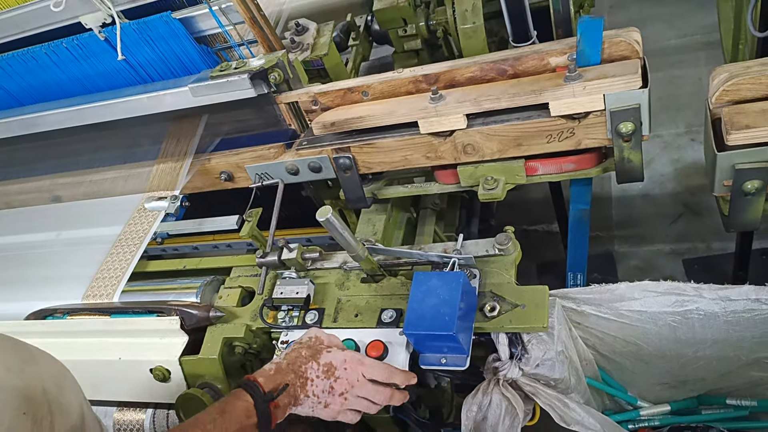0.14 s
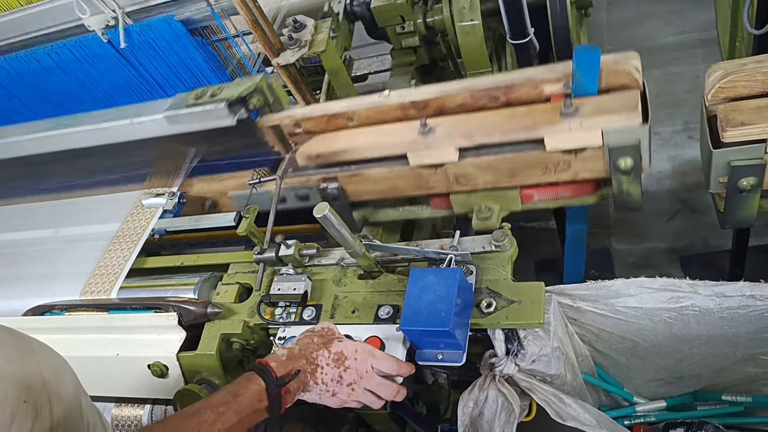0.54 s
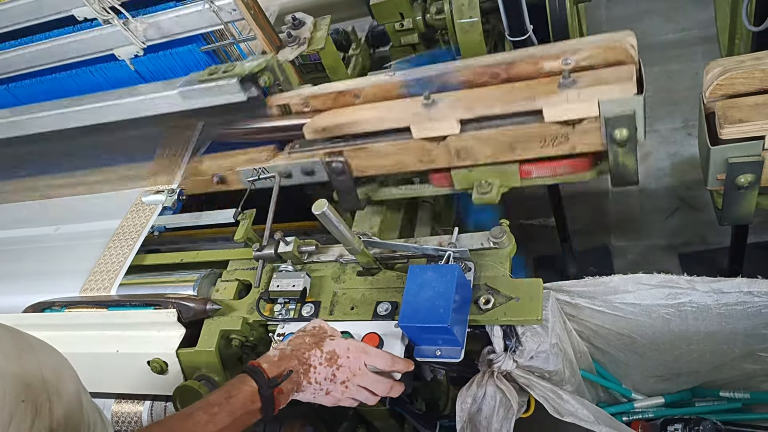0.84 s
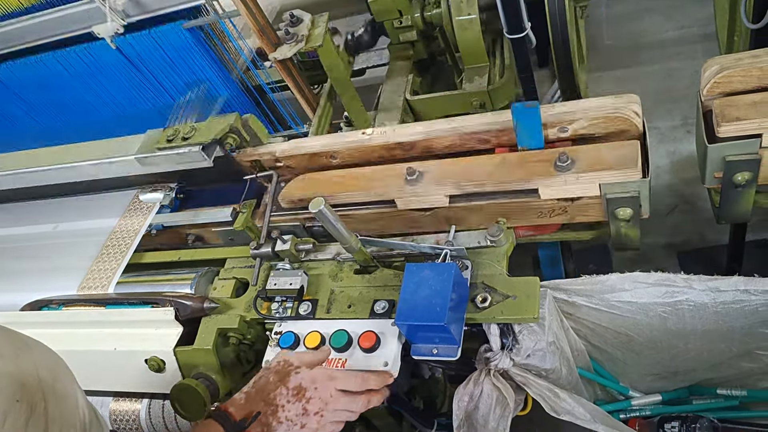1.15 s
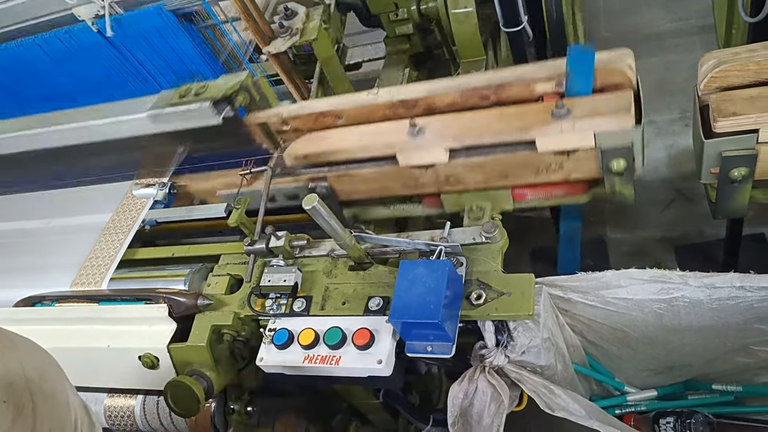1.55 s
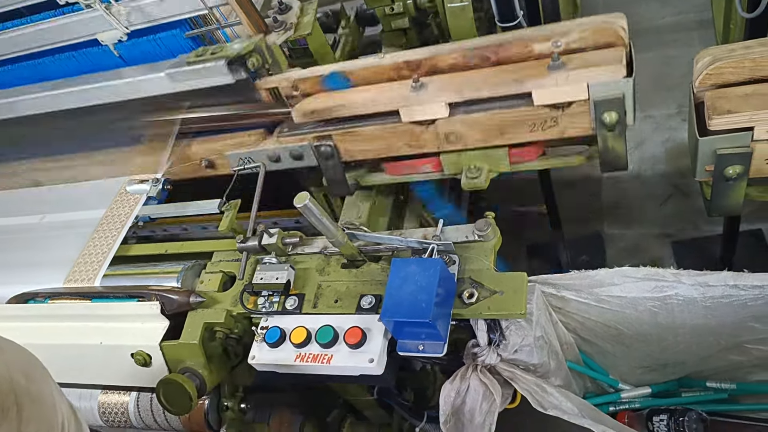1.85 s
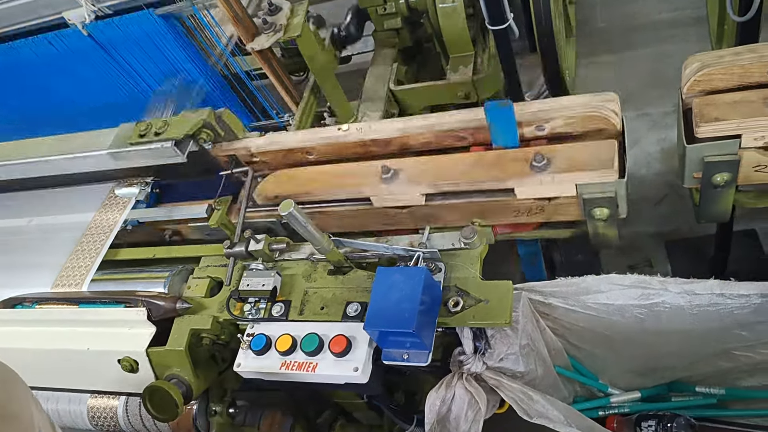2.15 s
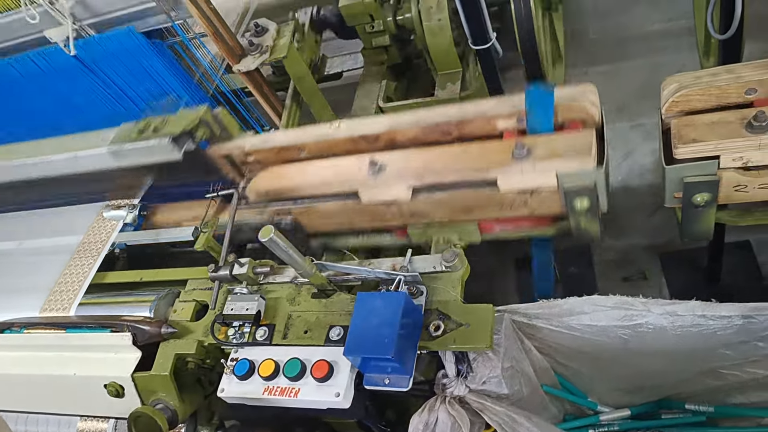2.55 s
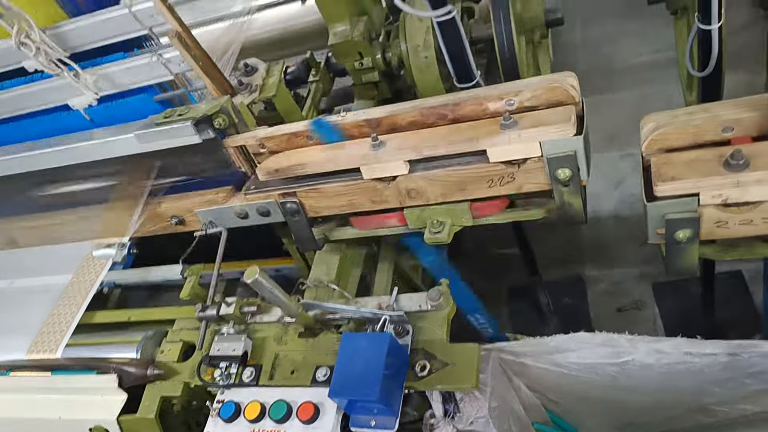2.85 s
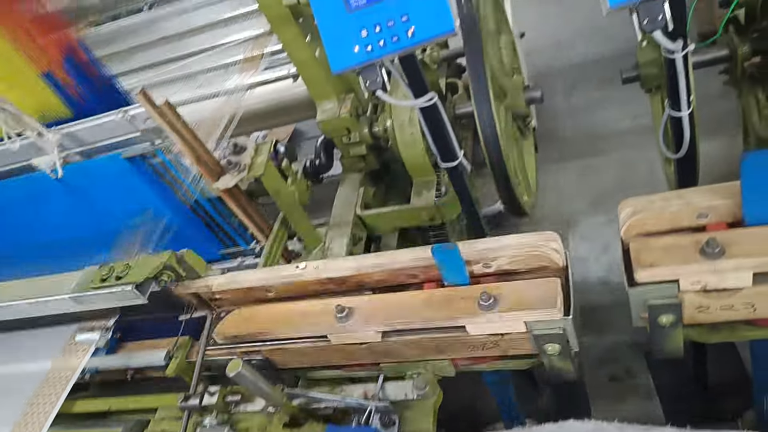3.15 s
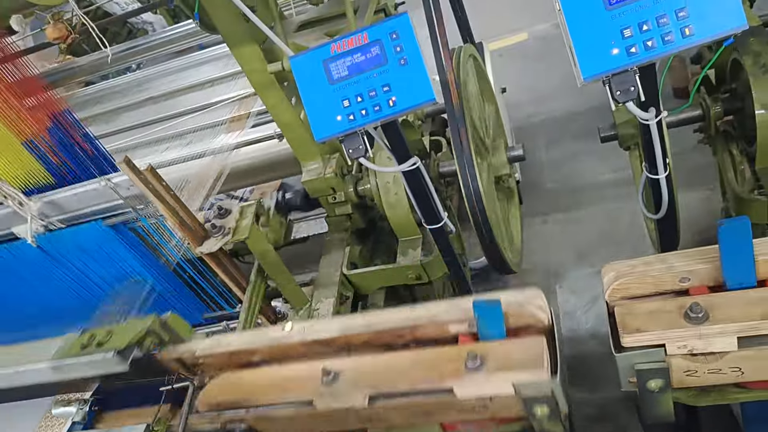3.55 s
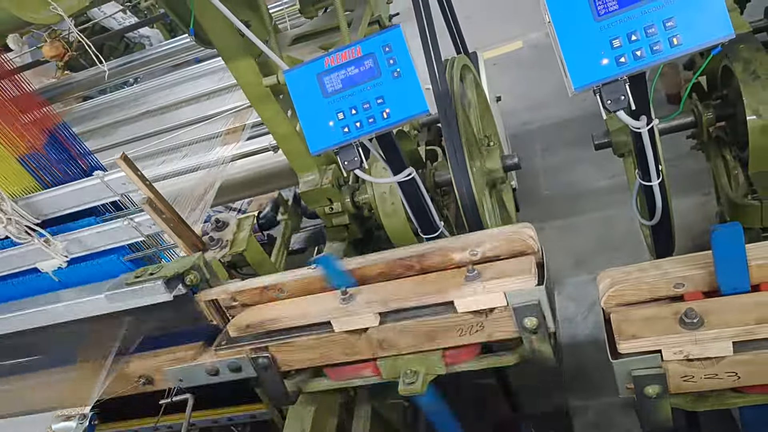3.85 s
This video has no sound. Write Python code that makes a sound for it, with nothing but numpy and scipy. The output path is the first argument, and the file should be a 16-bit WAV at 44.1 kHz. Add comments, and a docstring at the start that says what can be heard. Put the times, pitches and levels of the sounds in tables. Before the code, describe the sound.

A shuttle loom starts up in a hard-walled workshop. Low lumpy hum and faint hiss until 0.45 s, when the starter clunks and whirring begins; the clutch knocks at 0.7 s. From about 1 s, loud cracks come roughly every quarter second, four per turn, with clanks, rattling wash and small clatter between. Low thumps jolt the close stereo microphone, peaks softly clipped; it is still running at 4 s.

```python
"""A hard workshop, where idle machines hum and hiss behind a shuttle loom that starts up. The starter clunks,
the clutch takes up, gears and belt whir, then four blows repeat every turn: throw, landing, throw back,
far landing, with small linkage clatter between. Blows are noise cracks with a rattling wash that dies with the
room, coloured by the frame; damped sines make steel clanks and small knocks, and sagging sines make the shocks
through the microphone body. Two unequal ports hear it all under a soft ceiling."""
import sys
import numpy as np
from scipy import signal
from scipy.fft import rfft, irfft, next_fast_len
from scipy.io import wavfile
from scipy.ndimage import uniform_filter1d, map_coordinates

SR = 44100
rng = np.random.default_rng(int(sys.argv[2]) if len(sys.argv) > 2 else 0)


def generate_wav(sig):
    """Save sig (samples, or channels by samples) to the path in sys.argv[1] as 16-bit PCM at SR."""
    pcm = np.round(np.clip(np.atleast_2d(sig).T, -1, 1) * 32767).astype(np.int16)
    wavfile.write(sys.argv[1], SR, pcm)


N = 176400  # samples, 4 s

# Blows of the turning loom, levels ahead of frame and microphone:
# start_s, crack_db (nominal peak), wash_db (before its rise and unevenness)
THROW_BLOWS = [(1.479, 2, -14.5), (1.5, -5.5, -24.5), (2.461, -6.5, -19), (2.49, -10, -23.5),
               (3.445, -2.5, -18)]
LANDING_BLOWS = [(1.659, 3.5, -11.5), (1.679, -2.5, -14), (2.642, 1.5, -14.5), (2.662, -2.5, -15.5),
                 (3.624, 1, -12.5), (3.646, 2, -19.5)]
THROW_BACK_BLOWS = [(0.942, -36, -16), (0.957, -22, -29), (0.984, -1, -14.5), (1.008, -3, -13),
                    (1.968, -4, -24), (1.977, 1.5, -34), (1.988, -10, -16), (2.95, -12, -22.5),
                    (2.959, 1.5, -22.5), (2.973, -4.5, -20.5), (3.932, -8, -24), (3.941, -0.5, -17),
                    (3.959, -7, -33)]
FAR_LANDING_BLOWS = [(1.1861, 0, -13), (1.213, -5, -29), (2.153, -9.5, -19), (2.178, 0.5, -18),
                     (3.129, -16, -23), (3.157, -0.5, -18)]
LINKAGE_BLOWS = [(1.1099, -4.5, -22.5), (1.4216, -13, -21), (1.619, -17, -24.5), (1.924, -9.5, -20.5),
                 (2.095, -9, -23.5), (2.425, -12, -24), (2.6017, -14.5, -25.5), (2.909, -13.5, -21.5),
                 (3.078, -7, -25.5), (3.3834, -16.5, -30), (3.4087, -28, -28), (3.8855, -14.5, -25.5),
                 (3.9075, -15, -26.5)]


def amp(db):
    """Decibels as a gain."""
    return 10 ** (np.asarray(db) / 20)


def unit(x):
    """Scale to an rms of 1."""
    return x / np.sqrt(np.mean(x ** 2) + 1e-20)


def along(points, hz):
    """Read a (Hz, value) table, straight between points on a log frequency axis."""
    point_hz, value = np.transpose(points)
    return np.interp(np.log(hz + 1), np.log(point_hz + 1), value)


def curve(rows):
    """A (s, dB) table as gain per sample."""
    return amp(np.interp(np.arange(N) / SR, *np.transpose(rows)))


def wobble(rate):
    """A smooth random curve through normal values, rate knots a second."""
    knots = rng.standard_normal(int(N / SR * rate) + 9)
    return map_coordinates(knots, [np.arange(N) * rate / SR])


def filtered(x, response):
    """Multiply the spectrum of x by a response of frequency."""
    size = next_fast_len(N + 8192)  # spare room keeps tails from wrapping round
    hz = np.fft.rfftfreq(size, 1 / SR)
    return irfft(rfft(x, size) * response(hz), size)[..., :N]


def rush(spectrum, least=0):
    """Coloured stereo noise of rms 1; mid and side shares set how alike the two sides are."""
    # left-right likeness, wide in the treble: pitch_hz, correlation (0 to 1)
    likeness = [(60, 0.99), (300, 0.95), (650, 0.26), (1400, 0.013)]

    def mid_side(hz):
        turn = np.arccos(np.clip(along(likeness, hz), least, 1)) / 2
        return amp(along(spectrum, hz)) * [np.cos(turn), np.sin(turn)]

    mid, side = filtered(rng.standard_normal((2, N)), mid_side)
    return unit(np.array([mid + side, mid - side]))


def sides(pan_db):
    """Left and right gain for a left-right difference."""
    return amp([[pan_db / 2], [-pan_db / 2]])


def swell(t, rise):
    """Zero before the onset, then an exponential approach to 1 with time constant rise (s)."""
    return 1 - np.exp(-np.maximum(t, 0) / rise)


def hiss():
    """Far machines hiss: coloured noise with a slowly drifting level."""
    # colour of the hiss: pitch_hz, density_db (per Hz, relative)
    hiss_tone = [(300, 0.5), (500, -5), (840, -4), (2400, -9.5), (4000, -17.5), (7000, -33), (12000, -70)]
    return amp(-42.5 + 1.5 * wobble(4.3)) * rush(hiss_tone)


def hum():
    """Idle machines hum: low noise made lumpy by slow and quicker level wobbles."""
    # hum level before its wobble: time_s, level_db
    hum_level = [(0.0, -35.5), (0.78, -30), (4.0, -40)]
    # colour of the hum: pitch_hz, density_db (per Hz, relative)
    hum_tone = [(12, -40), (25, -4.5), (60, -5), (114, 2), (190, -3.5), (330, -16), (430, -9.5), (700, -35),
                (1200, -65)]
    lumps_db = 16.4 * np.log10(10) * 0  # placeholder
    lumps = amp(0.82 * wobble(5.8) + 2.4 * wobble(24.67))
    return curve(hum_level) * lumps * rush(hum_tone)


def whir():
    """Gears and belt of the loom: a finely uneven noise that swells in as the starter clunks."""
    # whir level before swell and wobble: time_s, level_db
    whir_level = [(0.4, -39.5), (1.08, -28.5), (4.0, -35.5)]
    # colour of the whir: pitch_hz, density_db (per Hz, relative)
    whir_tone = [(150, -48), (250, -11.5), (631, -8.5), (2310, -8.5), (4930, -16), (14000, -54)]
    running = swell(np.arange(N) / SR - 0.45, 0.014)
    return curve(whir_level) * running * amp(0.33 * wobble(150)) * rush(whir_tone)


def shocks():
    """Low pushes through the microphone body: sines whose pitch sags fast, unequal at the two ports."""
    # shocks: start_s, level_db (before the rise), left_right_db, t60_s, first_direction (1 or -1)
    pushes = [(1.4787, -22, 17, 0.12, 1), (1.6597, -6, 6, 0.041, 1), (1.99, -13, 21, 0.069, 1),
              (2.461, -18, 25.5, 0.12, -1), (2.6427, -5, 7, 0.046, 1), (2.973, -27.5, 23, 0.18, -1),
              (3.6284, -14, 11, 0.089, 1)]
    rise_s, first_hz, sag_s = 0.0021, 220, 0.0047  # the pitch has halved after sag_s
    out, t = np.zeros((2, N + SR)), np.arange(SR // 2) / SR
    push = swell(t, rise_s) * np.sin(2 * np.pi * first_hz * sag_s * np.log(1 + t / sag_s))
    for start_s, level_db, pan_db, t60_s, direction in pushes:
        shock = direction * sides(pan_db) * amp(level_db - 60 * t / t60_s) * push
        out[:, round(start_s * SR):][:, :len(t)] += shock
    return out[:, :N]


def knocks(start_s, pitch_hz, peak_db):
    """Short damped sines, each with its own left-right level and phase difference."""
    cycles, pan_scatter_db, rise_s = 26.5, 5.5, 0.00024  # cycles to fall 60 dB
    t = np.arange(SR // 50) / SR
    pan, phase = rng.standard_normal((len(start_s), 2)).T[..., None]
    first = np.round(start_s * SR).astype(int)[:, None]
    at = (first + np.arange(len(t))).ravel()
    fall_db = peak_db[:, None] - 60 * t * pitch_hz[:, None] / cycles
    turns = 2 * np.pi * pitch_hz[:, None] * t
    out = []
    for side in (1, -1):
        level = amp(fall_db + side * pan_scatter_db * pan / 2)
        rings = level * swell(t, rise_s) * np.sin(turns + side * phase)
        out.append(np.bincount(at, rings.ravel(), N + SR)[:N])
    return np.array(out)


def rattle():
    """Loose parts knock at random, loudest just after a blow and dying away with its wash."""
    per_s, t60_s, uneven_db = 260, 0.5, 3.5
    middle_hz, scatter_octaves = 2500, 0.35
    when, pitch, size = rng.random((N * per_s // SR, 3)).T
    s = when * N / SR
    blow_rows = THROW_BLOWS + LANDING_BLOWS + THROW_BACK_BLOWS + FAR_LANDING_BLOWS + LINKAGE_BLOWS
    start, _, wash_db = np.transpose(blow_rows)[..., None]
    fading = amp(wash_db - 60 * np.abs(s - start) / t60_s)
    power = ((s > start) * fading ** 2).sum(axis=0)
    # the log of a uniform draw gives many small knocks and a few large ones
    peak_db = 10 * np.log10(power + 1e-12) - uneven_db * np.log(size)
    octaves = scatter_octaves * np.log(pitch / (1 - pitch)).clip(-2, 2)
    return knocks(s, middle_hz * 2 ** octaves, peak_db)


def single_knocks():
    """Separate small knocks of wood and steel, as short damped sines."""
    # knocks: start_s, pitch_hz, peak_db (nominal, before rise and panning)
    knock_rows = [(1.9352, 1890, -13), (1.9478, 2280, -11), (1.9915, 2640, -2), (2.9283, 2380, -7.5),
                  (2.9355, 2300, -10), (3.409, 3500, -14), (3.4443, 2240, 0), (3.9148, 2410, -9),
                  (3.9562, 4300, 4)]
    return knocks(*np.transpose(knock_rows))


def clanks():
    """Steel parts sing out: a mode and four weaker, detuned neighbours beat unevenly and die."""
    # clanks: start_s, pitch_hz, level_db (before the modes are weighted and summed)
    clank_rows = [(0.452, 2330, -28.5), (.543, 1028, -29), (0.747, 1237, -27.5), (.94, 1075, -21),
                  (0.979, 1236, -20), (1, 1043, -18), (1.19, 2460, -20), (1.989, 1036, -17),
                  (2.176, 2350, -18), (2.487, 4200, -27), (2.659, 1229, -15.5), (2.977, 1046, -21.5),
                  (3.156, 2400, -22), (3.471, 4320, -24), (3.948, 2250, -18)]
    rise_s, spread = 0.0015, 0.032  # spread: detuning as a share of the pitch
    cycles_at_1khz = 190  # cycles to fall 60 dB; higher pitches take more, by the root of pitch
    out, t = np.zeros((2, N + SR)), np.arange(SR // 2) / SR
    for start_s, pitch_hz, level_db in clank_rows:
        detune, phase = rng.standard_normal((2, 5, 2, 1))  # five modes, two sides
        detune[0] = 0
        mode_hz = pitch_hz * (1 + spread * detune[:, :1])
        modes = np.sin(2 * np.pi * mode_hz * t + np.pi * phase)
        cluster = 2 * modes[0] + 0.6 * modes[1:].sum(axis=0)
        fall_db = level_db - 60 * t * np.sqrt(pitch_hz * 1000) / cycles_at_1khz
        out[:, round(start_s * SR):][:, :len(t)] += amp(fall_db) * swell(t, rise_s) * cluster
    return out[:, :N] * amp(wobble(110))


def blows(rows, tone, crack_t60_s, wash_rise_s, bright_db):
    """A noise crack, brighter by bright_db per octave, then a rattling wash whose bands die with the room."""
    # decay of the room: pitch_hz, t60_s
    room = [(300, 0.76), (2500, 0.73), (9000, 0.56), (15000, 0.55)]
    crest_db, hold_s, crack_rise_s = 9, 0.0023, 0.0008  # crest: nominal crack peak over its rms
    hz, frames, wash_bands = signal.stft(rush(tone), SR, nperseg=128)
    t = np.arange(SR // 2) / SR
    wash_power, crack_power = np.zeros(wash_bands.shape[1:]), np.zeros(N + SR)
    for start_s, crack_db, wash_db in rows:
        age = frames - start_s
        wash_fall_db = wash_db - 60 * np.maximum(age, 0) / along(room, hz)[:, None]
        wash_power += (amp(wash_fall_db) * swell(age, wash_rise_s)) ** 2
        crack_fall_db = crack_db - crest_db - 60 * np.maximum(t - hold_s, 0) / crack_t60_s
        crack_power[round(start_s * SR):][:len(t)] += (amp(crack_fall_db) * swell(t, crack_rise_s)) ** 2
    # random patches in time and pitch make the wash rattle
    grain = rng.standard_normal(wash_power.shape)
    patches = unit(uniform_filter1d(uniform_filter1d(grain, size=2, axis=0), size=5, axis=1))
    wash_bands = wash_bands * np.sqrt(wash_power) * amp(0.77 * patches)
    wash = signal.istft(wash_bands, SR, nperseg=128)[1][:, :N]
    bright_tone = [(f, db + bright_db * np.log2(f / 1000)) for f, db in tone]
    sharp = rush(bright_tone, least=0.6)  # cracks are more alike on both sides than the wash
    return wash + np.sqrt(crack_power[:N]) * sharp * amp(1.76 * wobble(400))


def starter_and_clutch():
    """The starter clunks and the clutch takes up: two differently coloured blows of one shape."""
    # start_s, crack_db (nominal peak), wash_db (before its rise and unevenness)
    starter_rows = [(0.452, -10, -24.5), (0.4835, -10.5, -44)]
    clutch_rows = [(0.7015, -13.5, -26.5)]
    # colours: pitch_hz, density_db (per Hz, relative)
    starter_tone = [(180, -38), (634, -18), (1030, 0), (1190, -13), (2100, -1), (16000, -33)]
    clutch_tone = [(300, -20), (1300, -10), (2300, -6.5), (16000, -27)]
    shape = dict(crack_t60_s=0.031, wash_rise_s=0.011, bright_db=0.9)
    return blows(starter_rows, starter_tone, **shape) + blows(clutch_rows, clutch_tone, **shape)


def linkage():
    """Small linkage clatter between the main blows, with a slowly rising wash."""
    # colour: pitch_hz, density_db (per Hz, relative)
    link_tone = [(180, -27), (1120, 5), (1390, -0.5), (2570, 1.5), (4590, -5.5), (16000, -41)]
    return blows(LINKAGE_BLOWS, link_tone, crack_t60_s=0.057, wash_rise_s=0.0095, bright_db=0.14)


def throw():
    """The shuttle is thrown: a short crack with a quick wash."""
    # colour: pitch_hz, density_db (per Hz, relative)
    throw_tone = [(180, -26), (425, 4.5), (750, -1.5), (1510, 2), (4230, 2), (16000, -26.5)]
    return blows(THROW_BLOWS, throw_tone, crack_t60_s=0.029, wash_rise_s=0.0041, bright_db=0.14)


def landing():
    """The shuttle lands: a crack with the quickest wash of all."""
    # colour: pitch_hz, density_db (per Hz, relative)
    landing_tone = [(180, -64), (440, -12.5), (801, -17), (1210, -6), (1900, -7.5), (2270, -0.5),
                    (2650, -8), (4590, -10), (16000, -50)]
    return blows(LANDING_BLOWS, landing_tone, crack_t60_s=0.039, wash_rise_s=0.003, bright_db=0.14)


def throw_back():
    """The shuttle is thrown back: clusters of longer, brightened cracks."""
    # colour: pitch_hz, density_db (per Hz, relative)
    back_tone = [(180, -19.5), (398, -8), (885, -14.5), (1030, -2.5), (1300, -6), (4230, -9.5),
                 (16000, -42.5)]
    return blows(THROW_BACK_BLOWS, back_tone, crack_t60_s=0.081, wash_rise_s=0.0062, bright_db=1)


def far_landing():
    """The shuttle lands on the far side: the shortest cracks."""
    # colour: pitch_hz, density_db (per Hz, relative)
    far_tone = [(200, -26), (1610, -6.5), (1970, -5.5), (2440, -2.5), (2650, -6.5), (4750, -12),
                (16000, -38)]
    return blows(FAR_LANDING_BLOWS, far_tone, crack_t60_s=0.026, wash_rise_s=0.0043, bright_db=0.41)


def loom():
    """Blows ring the frame's modes, loose steel joins in; the right port is farther, so it hears later."""
    # modes of the frame: pitch_hz, gain_db at the mode
    frame_modes = [(1395, 1.5), (2146, 5.5), (2440, 3.5), (4125, 5.5)]
    mode_width = 0.011  # share of each mode's pitch
    right_lag_s, lag_from_hz = 0.000446, 950  # below this pitch both ports hear in step

    def frame(hz):
        response = 1
        for mode_hz, gain_db in frame_modes:
            damping = 1j * hz * mode_width * mode_hz
            response = response + (amp(gain_db) - 1) * damping / (mode_hz ** 2 - hz ** 2 + damping)
        return response

    def lag(hz):
        half_turn = np.pi * np.maximum(hz - lag_from_hz, 0) * right_lag_s
        return np.exp(-1j * half_turn * np.array([[-1], [1]]))

    hits = starter_and_clutch() + linkage() + throw() + landing() + throw_back() + far_landing()
    return filtered(filtered(hits, frame) + clanks() + rattle() + single_knocks(), lag)


def scene():
    """The workshop behind, the shocks and the loom together."""
    return hiss() + hum() + whir() + shocks() + loom()


def record(dry):
    """Two unequal ports in a coloured housing, a soft ceiling, a band limit."""
    # colour of the housing: pitch_hz, gain_db
    housing = [(1700, -1), (2300, 0.5), (2900, 0), (7400, 1), (8250, 6), (9200, 3.5)]
    # balance of the ports: pitch_hz, left_right_db
    port_balance = [(120, 1), (400, -2.5), (1000, 3.5), (1500, -3.5), (2300, -6.5), (3000, 5.5),
                    (4800, 5.5), (6500, -3), (7600, -4), (8200, 54), (10000, 10), (13500, 3), (15500, -12)]
    ceiling, knee, top_hz = 0.99, 6, 15800

    def ports(hz):
        left_share = 1 / (1 + amp(-2 * along(port_balance, hz)))  # share of the power
        return amp(along(housing, hz)) * np.sqrt(2 * np.array([left_share, 1 - left_share]))

    heard = filtered(dry, ports)
    held = heard / (1 + np.abs(heard / ceiling) ** knee) ** (1 / knee)
    return filtered(held, lambda hz: hz < top_hz)


dry = scene()
out = record(dry)
generate_wav(out)
```